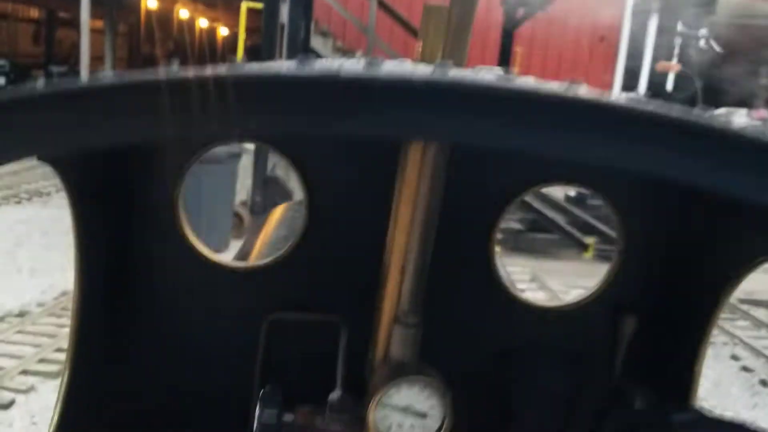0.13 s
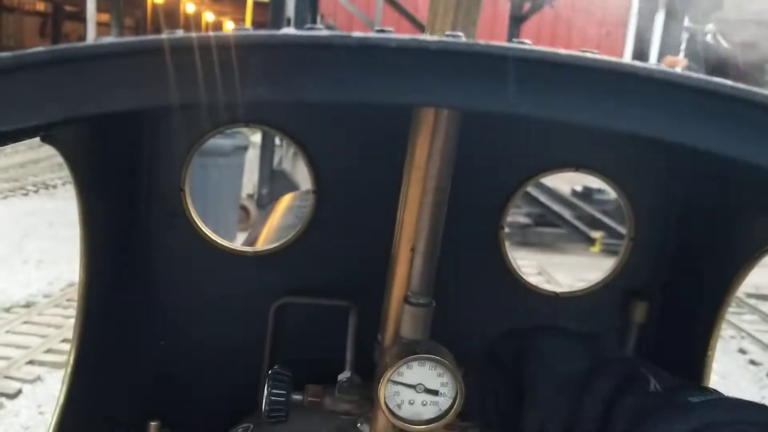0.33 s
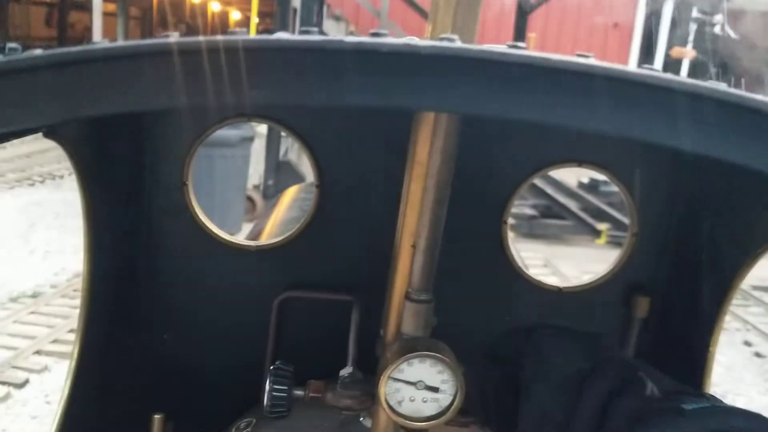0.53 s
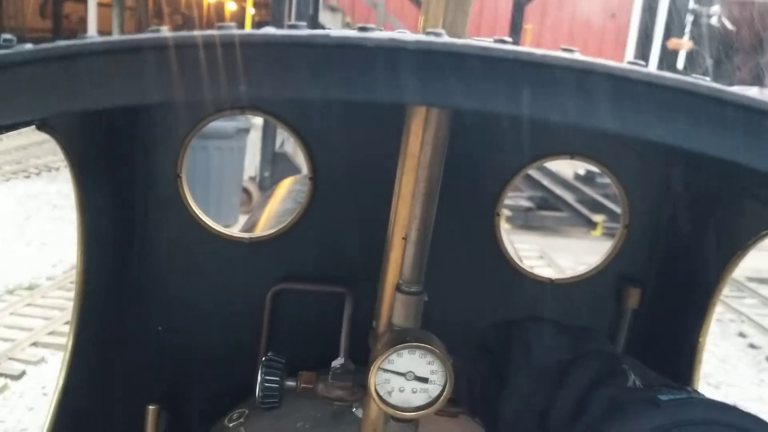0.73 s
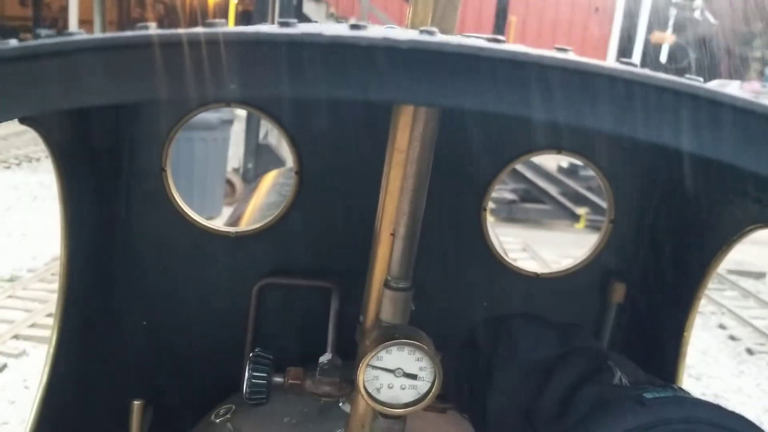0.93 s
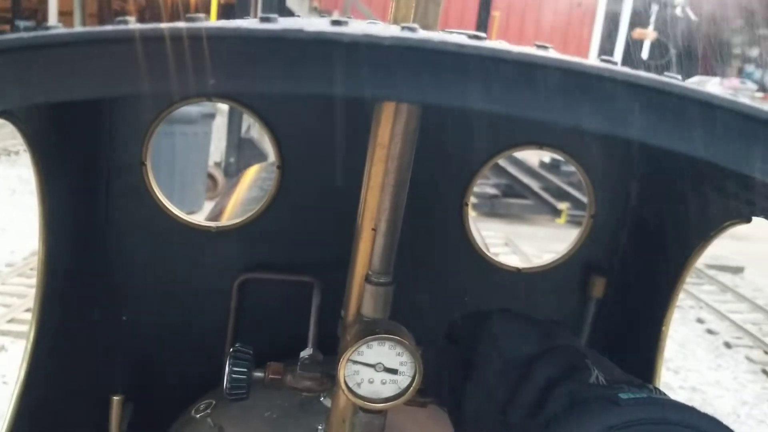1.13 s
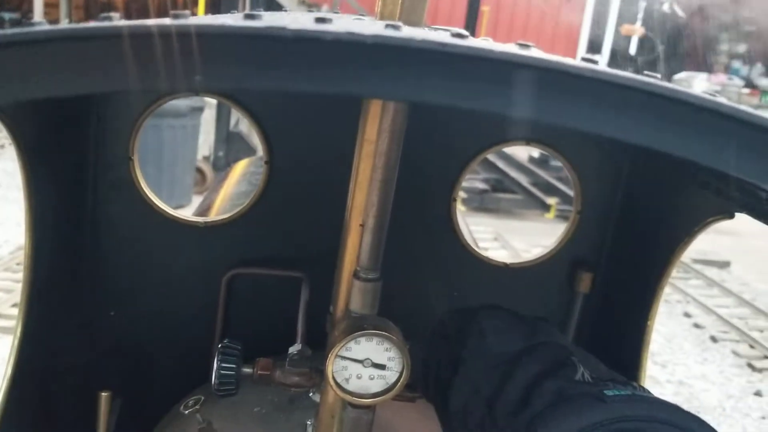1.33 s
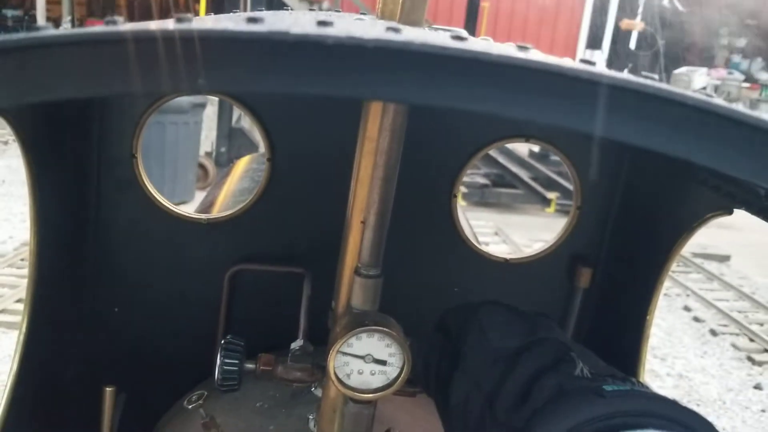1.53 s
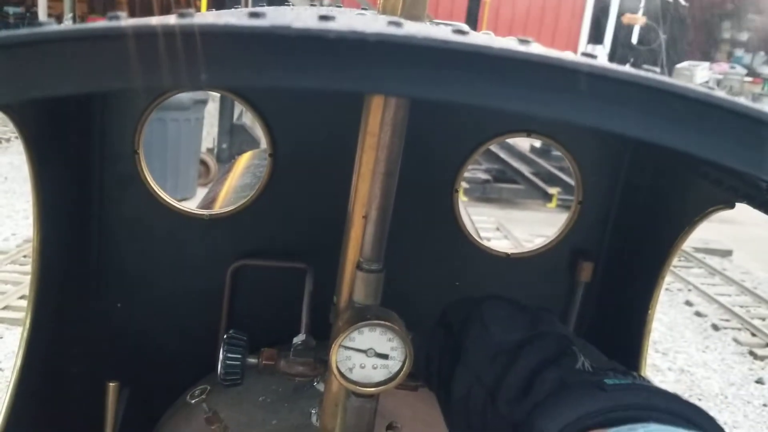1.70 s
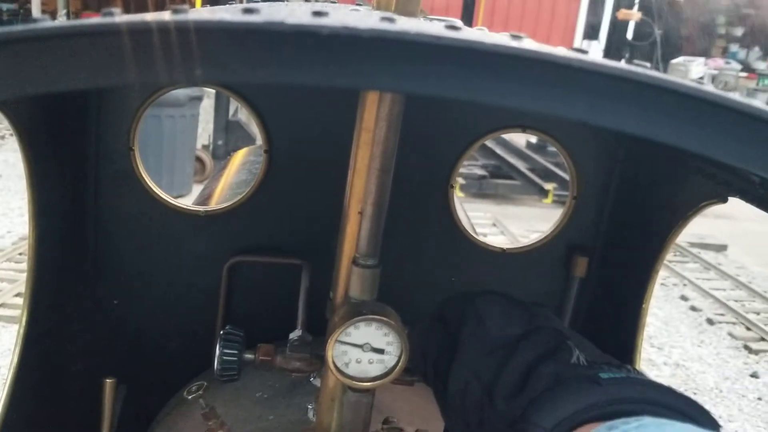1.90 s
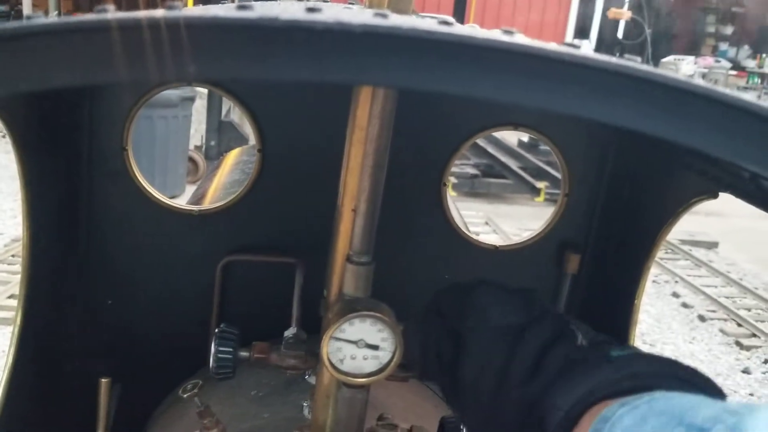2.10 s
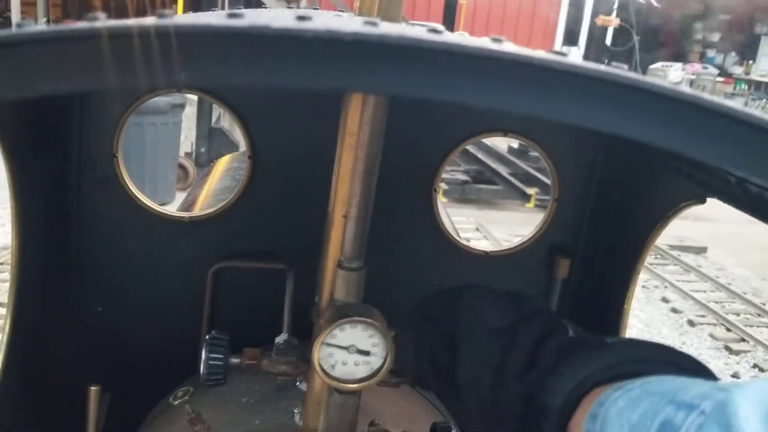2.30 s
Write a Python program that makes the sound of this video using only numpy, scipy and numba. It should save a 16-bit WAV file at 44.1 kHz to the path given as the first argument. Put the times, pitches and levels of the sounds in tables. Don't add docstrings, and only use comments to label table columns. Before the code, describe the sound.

A steam whistle, very close in an open steel cab. Faint rumble, hum and soft handling knocks until 0.2 s, when bright steam hiss bursts in, breathy and faintly pitched. Near 1.0 s it catches into a piercing, slightly fluttering high note, wobbling briefly, then steady while the phone ducks the background. At 2.1 s it sags and cuts off, leaving a faint outdoor echo and near silence.

```python
import sys
import numpy as np
from scipy import signal
from scipy.fft import rfft, irfft
from scipy.io import wavfile
from scipy.ndimage import uniform_filter1d
from numba import njit

SR = 44100
rng = np.random.default_rng(int(sys.argv[2]) if len(sys.argv) > 2 else 0)


def boost_factor(decibels):
    exponent = np.asarray(decibels, float) / 20
    return 10 ** exponent


def generate_wav(sig):
    pcm = np.round(np.clip(np.atleast_2d(sig).T, -1, 1) * 32767).astype(np.int16)
    wavfile.write(sys.argv[1], SR, pcm)


N = 103635

# time in seconds, hiss level in dB, pipe pitch in Hz.
STEAM_FLOW = [(0.18, -64.5, 1630), (0.19, -32, 1560), (0.225, -20.5, 1550), (0.29, -18.5, 1540),
              (0.38, -18.5, 1470), (0.45, -13.5, 1530), (0.62, -13, 1600), (1.0, -10, 1620),
              (1.08, -6, 1614), (1.14, -4.5, 1602), (1.5, -4, 1594), (2.04, -5, 1594), (2.07, -7, 1581),
              (2.11, -24, 1503), (2.15, -39.5, 1455)]
# time in seconds, level in dB.
TONE_STRENGTH = [
    (1.03, 4),
    (1.1, 12.5),
    (1.2, 17),
    (1.7, 20.5),
    (2.06, 20.5),
    (2.1, 13.5),
    (2.13, 7.5),
    (2.14, -9),
    (2.155, -41.5),
]
# multiple of the pitch, level in dB, left-right in dB, left lag in rad, flutter in dB.
OVERTONES = [(1, -1, 11.5, 1.72, .5), (2, -32, 16, 1.1, 1.4), (3, -17.5, 8, -1.6, 1.3),
             (4, -46.5, -14.5, 0.31, 2), (5, -48.5, -15, 0.21, -2.7)]
# multiple of the pitch, width in Hz, level in dB, change once locked in dB.
PIPE_MODES = [(1, 50.45, -12.5, 0), (1, 295, -13.5, -4.5), (1.4, 377, -18.5, -6.5), (2, 540, -19.5, -2)]
# centre in Hz, width in Hz, level in dB, change once locked in dB.
UPPER_MODES = [(4736, 230, -12, 1), (5100, 610, -11, -8.5), (4777, 46, -19, -1)]
# frequency in Hz, density in dB per Hz.
JET_COLOUR = [(300, -25.5), (900, -16.5), (3000, -21.5), (6500, -12.5), (8500, -6), (11500, 4),
              (13800, -8.5), (15400, -10.5)]
# frequency in Hz, density in dB per Hz.
LEAK_COLOUR = [(300, -7), (600, -11.5), (1500, -13), (3500, -19), (5500, -27.5), (9500, -26.5),
               (10600, -13.5), (12000, -24.5)]
# frequency in Hz, density in dB per Hz.
RUMBLE_COLOUR = [(15, -35.5), (25, 0), (75, -0.5), (193, -9), (227, -9), (267, -16), (500, -27.5),
                 (650, -53), (1100, -120)]
# time in seconds, level in dB, pitch in Hz.
BUMPS = [
    (0.013, -21.5, 90),
    (0.095, -35, 900),
    (0.108, -42, 700),
    (0.116, -25, 69),
    (0.26, -26.5, 400),
    (0.285, -20, 83.5),
    (0.649, -28, 70),
    (1.246, -17.5, 73.4),
    (1.817, -9, 85),
]
# frequency in Hz, left-right in dB, likeness 0-1, left lag in rad.
MIC_PORTS = [(59.8, -8.5, .9, -12), (248, -7, 0.7, -1.9), (700, 8.5, 1, -0.45), (1600, 10.5, 1, 2.15),
             (2900, 4.5, 0.1, 7.5), (4940, 6.5, 0.3, 12), (7800, -12.5, 0.1, 14), (15000, -16, 1, 26)]
# centre in Hz, width in Hz, depth 0-1.
NOISE_DIPS = [(1914, 93, 0.32), (2498, 150, 0.5), (3362, 200, 0.2), (4590, 67, 0.7), (6296, 600, 0.4)]
# time in seconds, gain in dB.
PHONE_GAIN = [
    (0.2, 0),
    (0.45, -5),
    (1.008, -11),
    (1.03, -18),
    (1.2, -28),
    (1.3, -31),
    (1.75, -35),
    (2.35, -35),
]

CATCH_S, SPEAK_S = 1.033, 0.04
WOBBLE_HZ, WOBBLE_DB, WOBBLE_DECAY_S = 23.5, 4.5, 0.055
STEAM_FADE_DB_PER_DB, TONE_GROWTH_DB_PER_DB = 0.9, 0.5
UPPER_WAKE_S, UPPER_WAKE_RAMP_S, UPPER_ASLEEP_DB = 0.43, 0.058, -7.5
LOCK_RAMP_S = 0.26
FOCUS_DB, FOCUS_S = -10.5, 0.72
GUST_DB, JET_MIDS_LOST = 2, 0.32
ECHO_DB, ECHO_T60_S, ECHO_GAP_S = -35, 0.8, 0.012
BUMP_CYCLES, BUMP_PAN_DB = 0.5, 8
LEAK_DB = -39.5
HUM_HZ, HUM_DB = 229.1, -32.5
RUMBLE_DB, RUMBLE_RISE_DB_PER_S, RUMBLE_PAN_DB = -34.5, 3, 4
TOP_HZ = 15850


def curve(table, col):
    rows = np.array(table)
    return np.interp(np.arange(N) / SR, rows[:, 0], rows[:, col])


def over_hz(table, col):
    rows = np.array(table)
    hz = np.fft.rfftfreq(N, 1 / SR)
    return np.interp(np.log(hz + 1), np.log(rows[:, 0]), rows[:, col])


def unit(x):
    return x / np.sqrt(np.mean(x ** 2))


def walk(rate_hz):
    hold = int(SR / rate_hz)
    steps = np.repeat(rng.standard_normal(N // hold + 1), hold)
    w = uniform_filter1d(uniform_filter1d(steps, hold), hold)[:N]
    return (w - w.mean()) / w.std()


@njit
def svf(x, hz, width):
    y, band, low = np.empty(len(x)), 0., 0.
    for i in range(len(x)):
        g = np.tan(np.pi * hz[i] / SR)
        k = width / hz[i]
        v = (band + g * (x[i] - low)) / (1 + g * (g + k))
        band, low, y[i] = 2 * v - band, low + 2 * g * v, k * v
    return y


def coloured(white, table, flicker_db, rate_hz):
    octave = np.log2(np.fft.rfftfreq(N, 1 / SR) + 1)
    spec = rfft(white) * boost_factor(over_hz(table, 1))
    spec = spec * (octave > np.log2(table[0][0]) - 1)
    out = 0
    for centre in range(4, 15):
        band = irfft(spec * np.clip(1 - abs(octave - centre), 0, 1), N)
        out = out + band * boost_factor(flicker_db * walk(rate_hz))
    return unit(out)


def ports(pair):
    hz = np.fft.rfftfreq(N, 1 / SR)
    pan = boost_factor(over_hz(MIC_PORTS, 1) / 2)
    like = over_hz(MIC_PORTS, 2)
    lag = np.exp(-1j * over_hz(MIC_PORTS, 3))
    gain = 1 / np.sqrt((pan ** 2 + pan ** -2) / 2)
    for centre_hz, width_hz, depth in NOISE_DIPS:
        gain = gain * (1 - depth * np.exp(-((hz - centre_hz) / width_hz) ** 2))
    shared = rfft(pair[0]) * np.sqrt(1 + like)
    apart = rfft(pair[1]) * np.sqrt(1 - like)
    left = irfft((shared + apart) * pan * gain * lag, N)
    right = irfft((shared - apart) / pan * gain, N)
    return np.array([left, right])


def whistle_tone():
    since = np.arange(N) / SR - CATCH_S
    speak = np.sin(np.pi / 2 * np.clip(1 + since / SPEAK_S, 0, 1))
    since = np.clip(since, 0, None)
    wobble_db = WOBBLE_DB * np.cos(2 * np.pi * WOBBLE_HZ * since) * np.exp(-since / WOBBLE_DECAY_S)
    hz = curve(STEAM_FLOW, 2) * (1 + 0.00092 * walk(40.6) + 0.0017 * walk(250))
    phase = 2 * np.pi * np.cumsum(hz) / SR
    steam_db, strength_db = curve(STEAM_FLOW, 1), curve(TONE_STRENGTH, 1)
    dull_db = STEAM_FADE_DB_PER_DB * (steam_db - steam_db.max())
    dull_db = dull_db + TONE_GROWTH_DB_PER_DB * (strength_db - strength_db.max())
    side, out = np.array([[1], [-1]]), 0
    for k, db, pan_db, lag_rad, flutter_db in OVERTONES:
        level_db = db + side * pan_db / 2 + flutter_db * (walk(44.84) + walk(200))
        level_db = level_db + (k > 1) * dull_db
        out = out + boost_factor(level_db) * np.sin(k * phase - side * lag_rad / 2)
    return out * speak * boost_factor(strength_db + wobble_db)


def steam_hiss():
    open_white, pipe_white = rng.standard_normal((2, 2, N))
    t, pipe_hz = np.arange(N) / SR, curve(STEAM_FLOW, 2)
    locked = np.clip((t - CATCH_S + SPEAK_S) / LOCK_RAMP_S, 0, 1)
    focus_db = FOCUS_DB * np.clip((CATCH_S - t) / FOCUS_S, 0, 1)
    wake_db = UPPER_ASLEEP_DB * np.clip((UPPER_WAKE_S - t) / UPPER_WAKE_RAMP_S, 0, 1)

    jet = coloured(open_white, JET_COLOUR, 0.53, 25)
    mids = np.array([svf(j, np.full(N, 3500.), 6100.) for j in jet])
    jet = jet - JET_MIDS_LOST * locked * mids

    modes = [(k * pipe_hz, width, db, change) for k, width, db, change in PIPE_MODES]
    modes += [(np.full(N, 1. * hz), width, db + wake_db, change) for hz, width, db, change in UPPER_MODES]
    for hz, width_hz, db, change_db in modes:
        mode = np.array([svf(svf(w, hz, 1. * width_hz), hz, 2. * width_hz) for w in pipe_white])
        level_db = db + change_db * locked + (width_hz < 130) * focus_db + GUST_DB * walk(29.92)
        jet = jet + unit(mode) * boost_factor(level_db)
    spit_db = 0.38 * walk(12.4) + 0.8 * walk(150)
    return ports(jet * boost_factor(curve(STEAM_FLOW, 1) + spit_db))


def shed_echo(x):
    t = np.arange(SR) / SR
    tail = rng.standard_normal((2, SR)) * boost_factor(-60 * t / ECHO_T60_S) * (t > ECHO_GAP_S)
    tail = tail / np.sqrt(np.sum(tail ** 2) / 2)
    return signal.fftconvolve(x, tail, axes=1)[:, :N] * boost_factor(ECHO_DB)


def phone_bumps():
    out = 0
    for start_s, db, hz in BUMPS:
        turns = np.clip((np.arange(N) / SR - start_s) * hz + 0.57, 0, None)
        swell = (turns / BUMP_CYCLES) * np.exp(-turns / BUMP_CYCLES)
        out = out + boost_factor(db) * 3 * np.sin(2 * np.pi * turns) * swell
    return out * boost_factor(np.array([[BUMP_PAN_DB], [-BUMP_PAN_DB]]) / 2)


def blower_hum():
    hz = HUM_HZ * (1 + 0.002 * walk(12))
    return np.sin(2 * np.pi * np.cumsum(hz) / SR) * boost_factor(HUM_DB + 0.91 * walk(15))


def frame_rumble():
    a, b = coloured(rng.standard_normal((2, N)), RUMBLE_COLOUR, 2.9, 18)
    pan_db = RUMBLE_PAN_DB * np.array([[0.5], [-0.5]])
    level_db = RUMBLE_DB + RUMBLE_RISE_DB_PER_S * np.arange(N) / SR + pan_db
    return boost_factor(level_db) * np.array([a + 0.42 * b, a - 0.13 * b])


def steam_leak():
    return ports(coloured(rng.standard_normal((2, N)), LEAK_COLOUR, 2.1, 5)) * boost_factor(LEAK_DB)


def scene():
    whistle = steam_hiss() + whistle_tone()
    cab = blower_hum() + frame_rumble() + steam_leak()
    return whistle + shed_echo(whistle) + phone_bumps() + cab


def low_pass(x):
    return signal.sosfilt(signal.butter(12, 17090, fs=SR, output="sos"), x)


def record(dry):
    ducked = dry * boost_factor(curve(PHONE_GAIN, 1))
    top_cut = signal.ellip(10, 0.2, 80, TOP_HZ, fs=SR, output="sos")
    return low_pass(signal.sosfilt(top_cut, ducked))


dry = scene()
out = record(dry)
generate_wav(out)
```